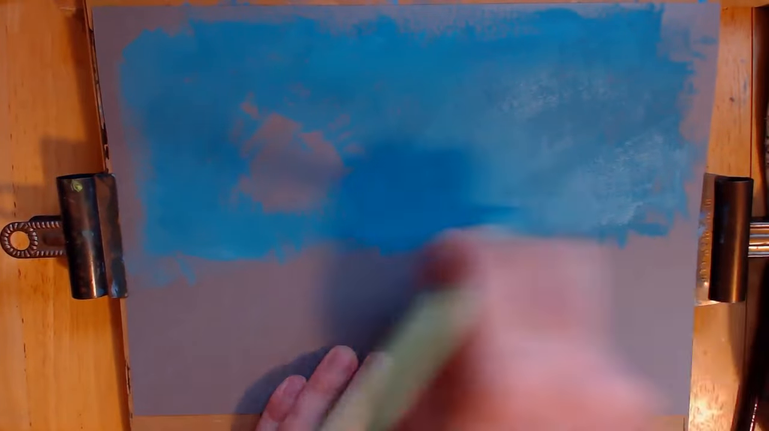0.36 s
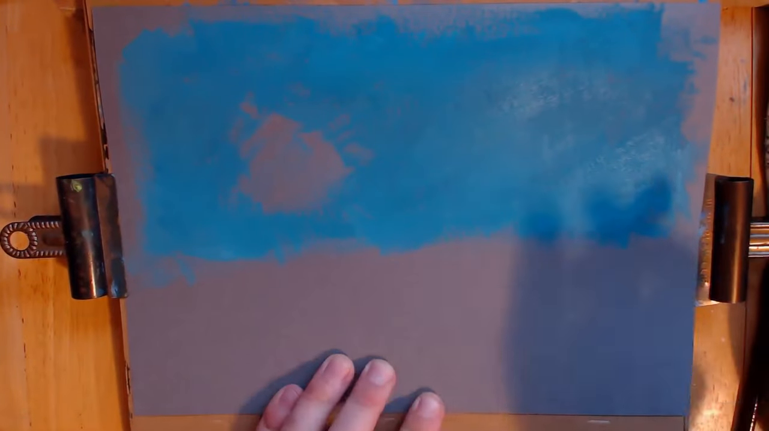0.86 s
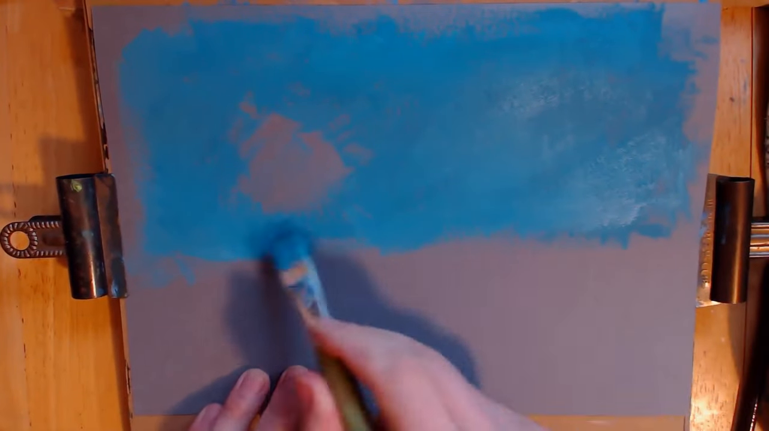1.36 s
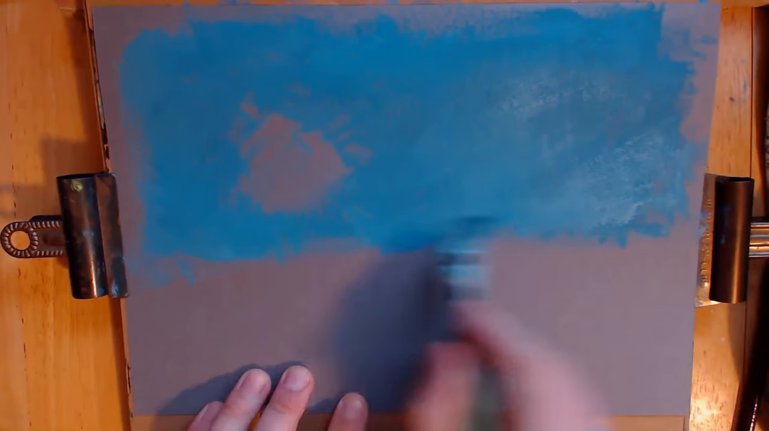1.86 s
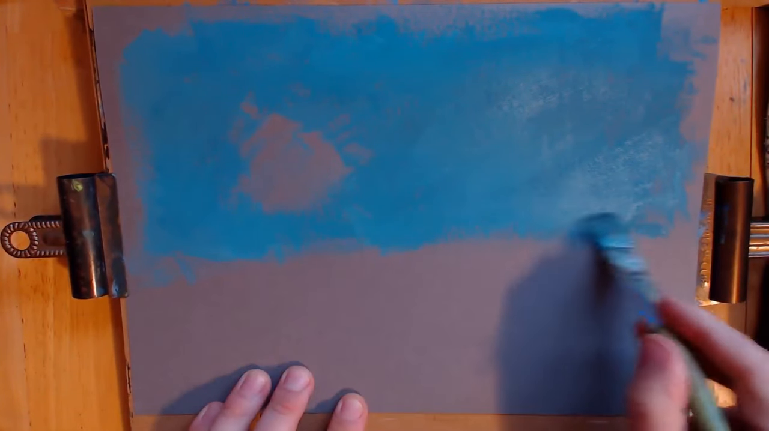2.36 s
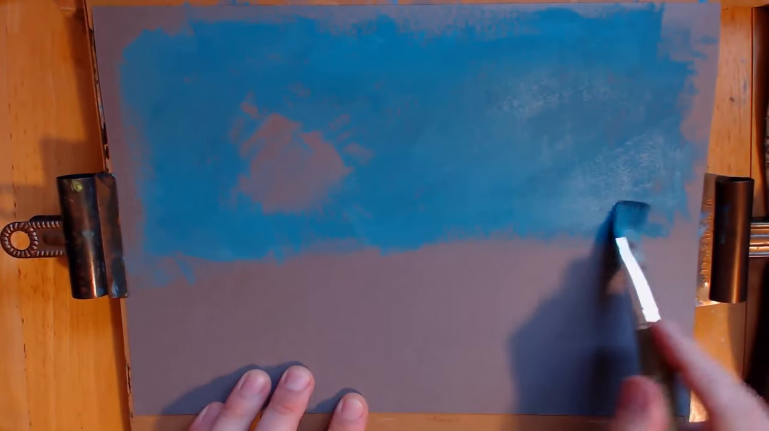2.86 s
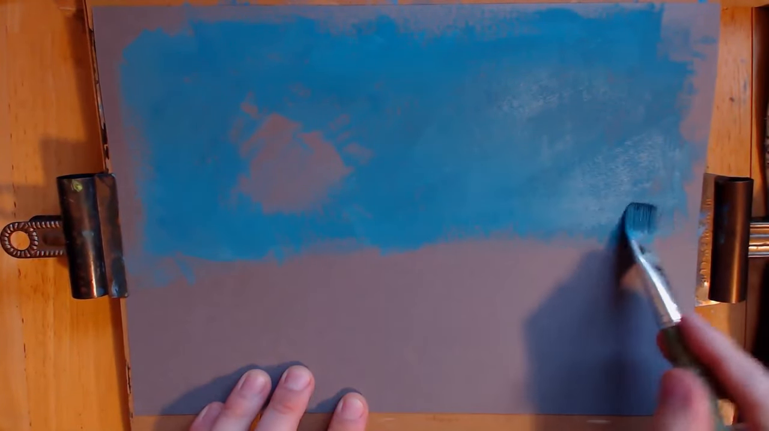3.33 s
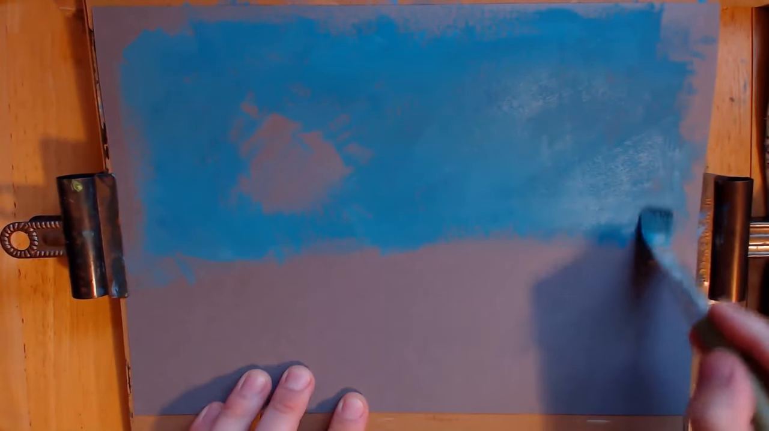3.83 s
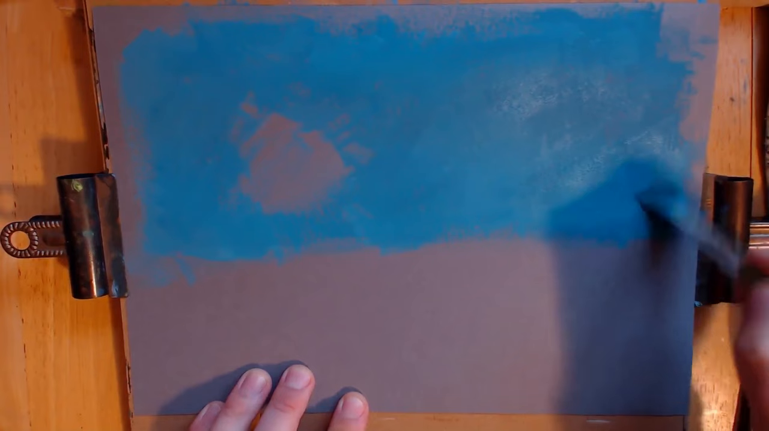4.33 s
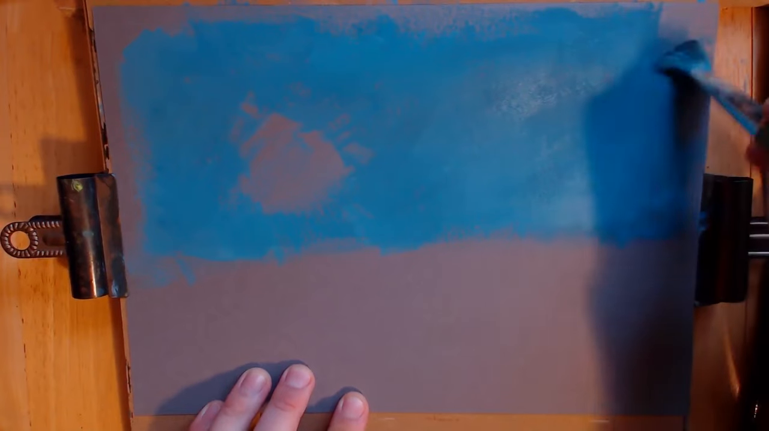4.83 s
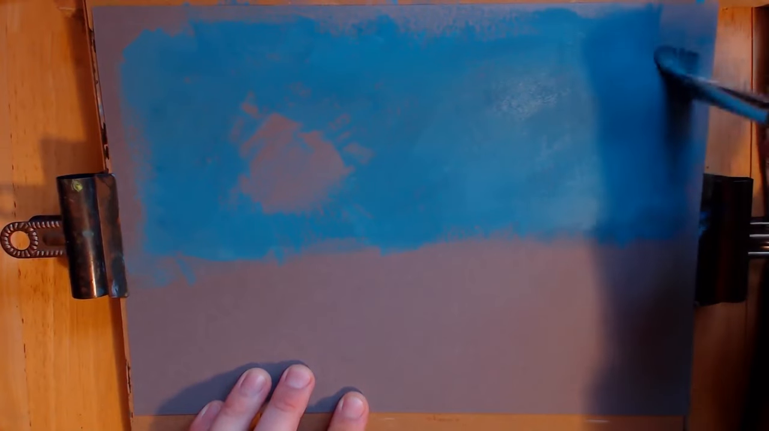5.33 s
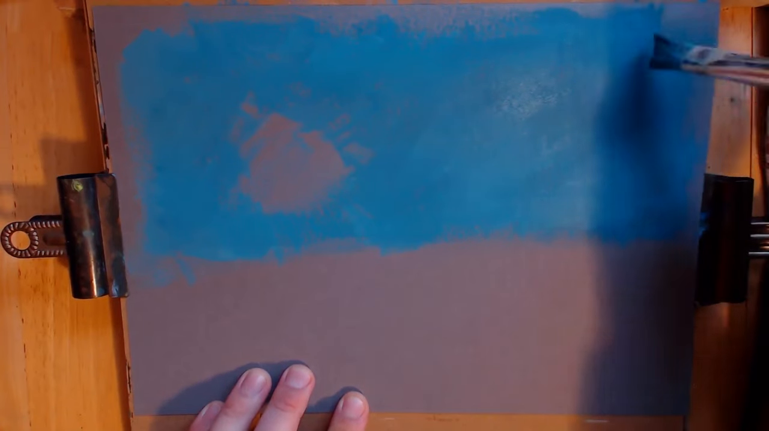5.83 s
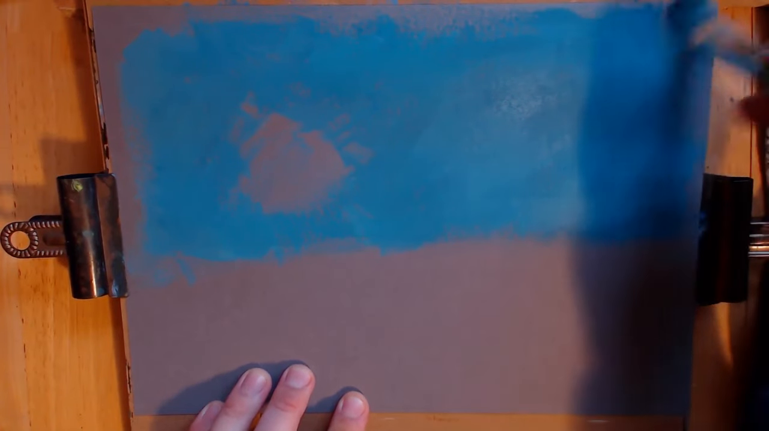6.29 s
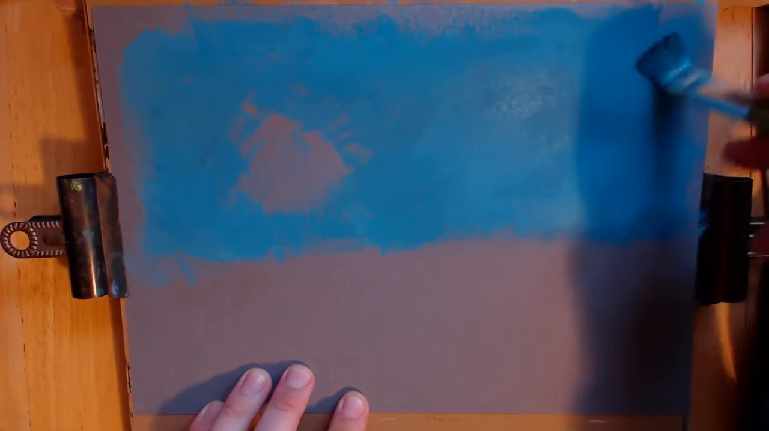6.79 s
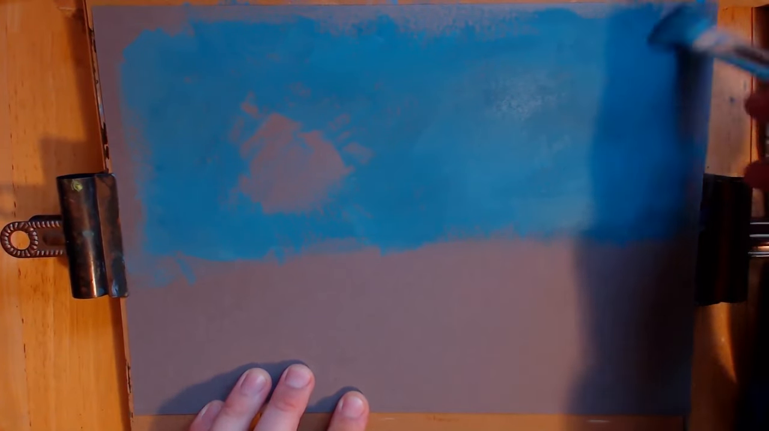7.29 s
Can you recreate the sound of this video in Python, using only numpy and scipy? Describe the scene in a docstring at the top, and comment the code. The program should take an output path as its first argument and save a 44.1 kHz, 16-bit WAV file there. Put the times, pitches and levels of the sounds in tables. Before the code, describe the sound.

A dry bristle brush rasps over paper on a board, a few separate sweeps first, then rapid back-and-forth scrubbing in a quiet room.

```python
"""A dry bristle brush works paint over paper clipped to a board on a desk, under a single microphone.
Six sweeps, then quick scrubbing: noise-like bristle slips are shaped into rasp and fizz on the grain,
and drive dull resonances of the board. Filtered noise makes the room's air and hums, and a desk sway
below hearing. Weak bands fall silent under loud strokes and the stereo image widens in patches."""
import sys
import numpy as np
from scipy import signal
from scipy.fft import rfft, irfft, next_fast_len
from scipy.io import wavfile
from scipy.ndimage import uniform_filter1d

SR = 44100
rng = np.random.default_rng(int(sys.argv[2]) if len(sys.argv) > 2 else 0)


def rack_gain(trim_db):
    """Turn a fader trim in dB into the linear factor to multiply a signal by."""
    fader = np.asarray(trim_db, float)
    return 10 ** (fader / 20)


def unload_wav(signal):
    """Save mono or channel-first audio to the path in sys.argv[1] as 16-bit WAV at rate SR, clipped to [-1, 1]."""
    wavfile.write(
        sys.argv[1],
        SR,
        np.round(np.clip(np.atleast_2d(signal).T, -1, 1) * 32767).astype(np.int16),
    )


N = 327150


def level(x, rms_db):
    """Scale to an rms level."""
    return x * rack_gain(rms_db) / np.sqrt(np.mean(x ** 2))


def ring(x, freq_hz, width_hz):
    """One resonance: a two-pole peak filter."""
    return signal.lfilter(*signal.iirpeak(freq_hz, freq_hz / width_hz, fs=SR), x)


def walk(rate_hz):
    """Random levels held 1 / rate_hz s and smoothed twice; spread near 1."""
    hold = int(SR / rate_hz)
    steps = np.repeat(rng.standard_normal(N // hold + 1), hold)
    return 1.47 * uniform_filter1d(uniform_filter1d(steps, hold), hold)[:N]


def response(points, size):
    """Gain per FFT bin through (freq_hz, gain_db) points, falling steeply outside them."""
    freq_hz, gain_db = np.transpose(points)
    log_hz = np.log(freq_hz)
    log_f = np.log(np.fft.rfftfreq(size, 1 / SR) + 1e-3)
    outside = np.maximum(log_hz[0] - log_f, 0) + np.maximum(log_f - log_hz[-1], 0)
    return rack_gain(np.interp(log_f, log_hz, gain_db) - 60 * outside)


def patches(x, points, tilt_db, patchy_db, rate_hz, count):
    """Colour x to rms 1, then tilt each band by its lower edge and let its level wander on its own."""
    size = next_fast_len(N)
    spectrum = rfft(x, size) * response(points, size)
    f = np.fft.rfftfreq(size, 1 / SR)
    edges_hz = np.geomspace(points[0][0], points[-1][0], count + 1)
    which = np.clip(np.searchsorted(edges_hz, f) - 1, 0, count - 1)
    bands = [irfft(spectrum * (which == k), size)[:N] for k in range(count)]
    wander = [rack_gain(tilt_db(edges_hz[k]) + patchy_db * walk(rate_hz)) for k in range(count)]
    return sum(b * w for b, w in zip(bands, wander)) / np.std(sum(bands))


def desk():
    """The desk rocks under the working arm and shakes the microphone: noise through slow resonances."""
    # desk sway: freq_hz, width_hz (each of two passes), level_db
    sway = [(5, 2.5, -40), (11, 4, -46), (18, 8, -55)]
    return sum(level(ring(ring(rng.standard_normal(N), hz, width), hz, width), db)
               for hz, width, db in sway)


def room():
    """Air noise, wavering a little band by band, with hums of household machines as narrow noise."""
    # air colour: freq_hz, relative_db (per Hz)
    air_points = [(13, -28), (22, 1), (32, -11.5), (61, -26.5), (76, -31.5), (128, -26.5), (299, -22.5),
                  (372, -30.5), (416, -28), (974, -32.5), (1090, -26.5), (1510, -31), (2160, -41),
                  (3840, -48), (15600, -54.5)]
    # machine hums: freq_hz, width_hz, level_db
    hums = [(50.4, 3.7, -59.5), (99.4, 2, -71), (127, 8, -67), (200, 17.5, -68), (297.8, 14, -74),
            (414.7, 14.4, -68), (1089, 6.7, -75)]
    air_db = -53
    air = rack_gain(air_db) * patches(rng.standard_normal(N), air_points, lambda hz: 0, 1.83, 6, count=8)
    hum = sum(level(ring(rng.standard_normal(N), hz, width), db) for hz, width, db in hums)
    return air + hum


def slips(scatter_db, flutter_db, rate_hz):
    """Countless bristle tips catch and let go, a few harder than the rest; the pressure flutters."""
    size_db = scatter_db * rng.exponential(size=N) + flutter_db * walk(rate_hz)
    return rng.standard_normal(N) * rack_gain(size_db)


def motion():
    """Amplitudes of rasp and fizz: each stroke speeds up, peaks and slows for the turn."""
    # long sweeps: contact_s, lift_s, rasp_start_db, rasp_lift_db, fizz_over_rasp_db (top speed)
    sweeps = [(-.02, 0.067, -66, -62, -5.5), (0.185, 0.313, -67, -59, 2), (0.602, 0.745, -64, -66, 4),
              (1.097, 1.279, -52, -50, 6), (1.397, 1.604, -49, -54.5, 5), (1.731, 1.958, -53.5, -51.5, 6)]
    # quick strokes: peak_s, length_ms (between -8 dB points), rasp_db, fizz_over_rasp_db
    scrubs = [(2.48, 27, -70, -16), (2.549, 25, -67, -5), (2.652, 39, -45, -5.5), (2.725, 53, -50, -3),
              (2.823, 42, -49, -11), (2.909, 46, -56.5, -6.5), (3.009, 34.5, -48, -5.5),
              (3.084, 44, -52.5, -4.5), (3.178, 42, -49.5, -21.5), (3.263, 51, -55, -6),
              (3.36, 37, -51, -20), (3.433, 50, -58, -6.5), (3.536, 62, -58, 1), (3.639, 74, -63, 3),
              (3.787, 74, -62.5, -2.5), (3.874, 35, -53.5, 4.5), (4.005, 59, -57, -3),
              (4.095, 52, -58.5, 1.5), (4.215, 56, -51, -0.5), (4.312, 45, -49, -2.5), (4.458, 52, -49, -1),
              (4.538, 39, -44, -4), (4.656, 50, -45, -3.5), (4.741, 38, -46, -2), (4.853, 43, -47.5, -4.5),
              (4.922, 40, -45, -2.5), (5.037, 43.4, -48.5, -4.5), (5.1, 47, -47.5, -3),
              (5.215, 34, -51.9, -5.5), (5.285, 51, -53.5, -2), (5.39, 34, -64.5, 2.5),
              (5.532, 14, -59.5, -3), (5.591, 54, -53, -7.5), (5.776, 34, -57, 2.5),
              (5.899, 47, -47.5, -1.2), (5.989, 45, -48, 0.5), (6.085, 39, -46, -4),
              (6.145, 46, -46.5, -1.5), (6.252, 37, -47.5, -12), (6.319, 44.5, -49, -4.5),
              (6.41, 42, -52, -12), (6.49, 50, -54.5, -8), (6.604, 72, -50, -4.5), (6.683, 39, -50.5, -5),
              (6.773, 72, -48.5, -4), (6.857, 41, -46.5, -3.5), (6.951, 83, -51, -4),
              (7.021, 43, -50, -7.5), (7.094, 52, -50, -10), (7.172, 31, -60.5, -2)]
    land_s, lift_s = 0.018, 0.027  # first 8 dB of swell or fade
    slow_dull_db = -7  # brightness lost at the slow ends of a sweep
    longest_turn_s, trail = 0.078, 1.13  # a longer wait is a pause; trail > 1 favours slowing down
    sharp, drag_db, drag_s = 1.79, -19, 0.057

    t = np.arange(N) / SR
    power = np.full((2, N), 1e-12)
    for start, lift, start_db, lift_db, bright_db in sweeps:
        along = np.clip((t - start) / (lift - start), 0, 1)
        outside = np.maximum(start - t, 0) / land_s + np.maximum(t - lift, 0) / lift_s
        rasp_db = start_db + (lift_db - start_db) * along - 8 * outside ** 1.1
        fizz_db = rasp_db + bright_db + slow_dull_db * (1 - np.sin(np.pi * along))
        power += rack_gain(np.array([rasp_db, fizz_db])) ** 2

    # the shorter the turn between two strokes, the quicker one fades and the next swells
    gaps_s = np.diff(np.array(scrubs)[:, 0], prepend=0, append=N / SR + 1)
    turns_s = np.minimum(gaps_s, longest_turn_s)
    for (peak_s, length_ms, rasp_db, bright_db), before, after in zip(scrubs, turns_s, turns_s[1:]):
        rise_ms = length_ms * before / (before + trail * after)
        near = slice(int((peak_s - .15) * SR), int((peak_s + .15) * SR))
        dt = t[near] - peak_s
        u = np.abs(dt) * 1000 / np.where(dt < 0, rise_ms, length_ms - rise_ms)
        stroke = rack_gain(-8 * u ** sharp) ** 2
        # the bristles still drag and flip over while the hand turns
        drag = rack_gain(drag_db - 20 * (dt / (2 * drag_s)) ** 2) ** 2
        power[:, near] += rack_gain(np.array([[rasp_db], [rasp_db + bright_db]])) ** 2 * (stroke + drag)
    return np.sqrt(power)


def brush():
    """Slips heard directly as rasp and fizz, and through the board's resonances."""
    # bristles on paper grain, lower and upper range: freq_hz, relative_db (per Hz)
    rasp_points = [(2400, -13.5), (3000, -13), (3500, -7.5), (4000, -2.5), (4800, -0.5), (5600, 2.5),
                   (7000, 0.5), (9000, -4.5)]
    fizz_points = [(9000, -4), (10500, -1), (12000, -1), (13000, -0.5), (14200, 1), (15700, -6.5)]
    # board and sheet resonances: freq_hz, width_hz (each of two passes), relative_db
    modes = [(1153, 255, -3.5), (1310, 97, 2.5), (1423, 220, 2), (1962, 192, -4.5), (2125, 245, -4.5)]
    # brush hold: time_s, finest_tips_db, board_pressure_db, upper_modes_db
    grip = [(0, -3, 10.5, -10), (.26, -1, 9.5, -4), (.33, 0.5, -11, -3), (.7, -3, 4, 4),
            (1.1, -6, -0.5, 3.5), (1.22, -4, -0.5, -10), (1.4, 1.5, -3, -0.5), (1.55, -12, 7, -2.5),
            (1.9, -9, 2, 1.5), (2.65, 1.5, -3, 0), (3, -5.5, 2, 5.5), (3.45, -1, -3, 6), (4, -10, -1, 1),
            (4.5, 3.5, -9.5, -2), (5.2, 4, -8.5, -3.5), (5.6, 3, -5.5, 4), (6, -7, -5, -2.5),
            (6.3, 1.5, -4.5, 0.5), (7.2, 1, -3, 1)]
    stiff_base_db, stiff_per_dull = 1, 0.77  # slow, dull contact scrapes lower

    rasp, fizz = motion()
    time_s, *columns = np.transpose(grip)
    fine_db, press_db, upper_db = (np.interp(np.arange(N) / SR, time_s, c) for c in columns)
    bright_db = np.clip(20 * np.log10(fizz / rasp), -8, 12)
    stiff_db = stiff_base_db - stiff_per_dull * bright_db
    # the hand keeps pressing through the turns
    board = rack_gain(press_db) * np.sqrt(uniform_filter1d(rasp ** 2, size=1200) + 1e-12)
    tips = slips(1.93, 1.37, 150)
    push = slips(2.15, 3.3, 60)

    # other bristles keep taking the load, so the colour shifts in patches
    wood = 0
    for hz, width, db in modes:
        gain_db = db + upper_db * (hz > 1700) + 3.76 * walk(18)
        wood = wood + rack_gain(gain_db) * ring(ring(push, hz, width), hz, width)
    low = patches(tips, rasp_points, lambda hz: stiff_db * (hz < 3500), 2.3, 22, count=9)
    high = patches(tips, fizz_points, lambda hz: fine_db * (hz > 12000), 2.5, 22, count=7)
    return rasp * low + fizz * high + board * level(wood, -1.18)


def scene():
    """A single microphone feeds both channels."""
    return np.tile(brush() + room() + desk(), (2, 1))


def band_limit(x):
    """A steep low-pass at the top of the band."""
    return signal.sosfilt(signal.butter(12, 15760, fs=SR, output="sos"), x)


def record(dry):
    """Bands below a frequency-dependent threshold, set by treble loud for a while, fall silent."""
    # threshold relative to the treble: freq_hz, margin_db
    margin = [(150, 5), (400, 0.5), (750, 0), (1400, -3), (2000, -6.5), (3000, -6), (4200, -9),
              (6000, -10.5), (11000, -9), (15000, -18)]
    top_hz, soft_db, memory_s, linger_db = 15760, 0.5, 0.083, 4
    quiet_db, drop_share = 9, 0.36  # quiet limit above the treble's lowest tenth; share of frames
    wide_share, wide_db = .16, -8

    hop = 1024
    f, _, z = signal.stft(dry[0], SR, nperseg=2 * hop, noverlap=hop, window="cosine")
    edges_hz = np.r_[0, np.arange(170, 2000, 170), 2000 * 1.12 ** np.arange(19)]
    band = np.searchsorted(edges_hz, f, side="right") - 1
    power = np.array([np.mean(np.abs(z[band == k]) ** 2, axis=0) for k in range(len(edges_hz))])
    treble = power[edges_hz > 4000].mean(axis=0)

    # slow to close in, quick to let go when the treble stops
    keep = np.exp(-hop / SR / memory_s)
    smoothed = signal.lfilter([1 - keep], [1, -keep], treble)
    recent = np.minimum(smoothed, treble * rack_gain(linger_db) ** 2)
    margin_hz, margin_db = np.transpose(margin)
    threshold_db = np.interp(np.log(edges_hz + 1), np.log(margin_hz), margin_db)
    over_db = 10 * np.log10(power / (recent + 1e-20) + 1e-20) - threshold_db[:, None]
    audible = 1 / (1 + np.exp(np.clip(-over_db / soft_db, -40, 40)))
    z = z * (f < top_hz)[:, None] * audible[band]

    # in quiet moments the treble drops out for an instant, from the top down
    quiet = treble < np.quantile(treble, .1) * rack_gain(quiet_db) ** 2
    draw = rng.random((2, len(treble)))
    cut_hz = np.where(quiet & (draw[0] < drop_share), 2500 + 11000 * draw[1], SR)
    spared = rng.random(power.shape) < .3 * (edges_hz < 9000)[:, None]
    z = z * ((f[:, None] < cut_hz) | spared[band])

    # the image widens in short patches, often over many bands at once
    chance = rng.random(power.shape) * .5 + rng.random(power.shape[1]) * .5
    wide = (chance < np.quantile(chance, wide_share)) * rack_gain(wide_db)
    side_z = z * wide[band] * np.exp(2j * np.pi * rng.random(z.shape)) * (f > 90)[:, None]
    mid, side = (signal.istft(v, SR, nperseg=2 * hop, noverlap=hop, window="cosine")[1][:N]
                 for v in (z, side_z))
    hiss = rack_gain(-101) * rng.standard_normal((2, N))
    mix = np.array([mid + side, mid - side]) + hiss
    return band_limit(mix)


dry = scene()
out = record(dry)
unload_wav(out)
```